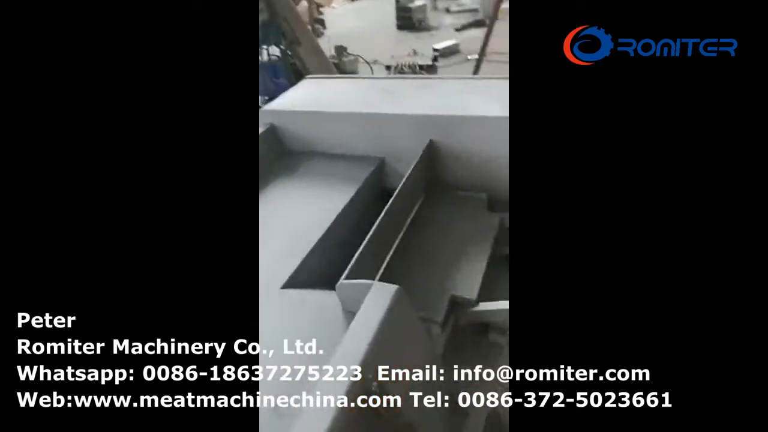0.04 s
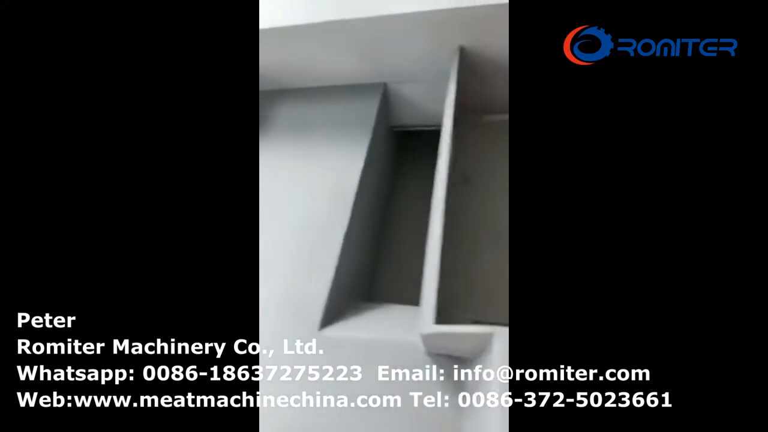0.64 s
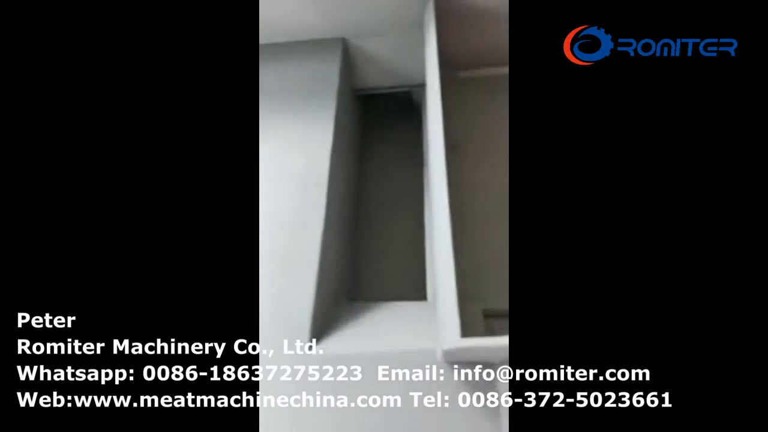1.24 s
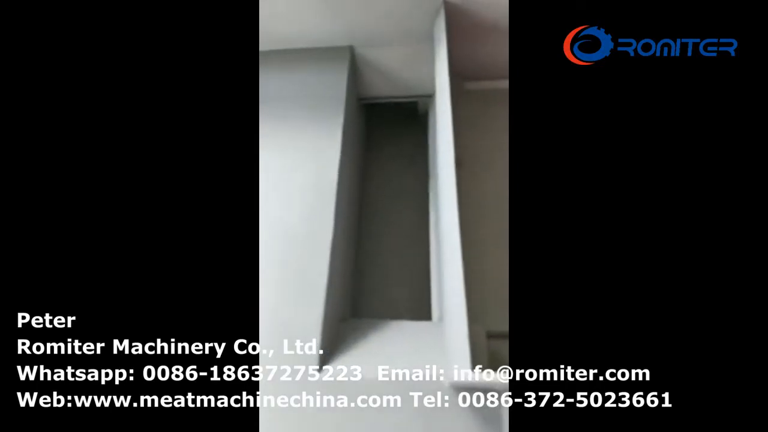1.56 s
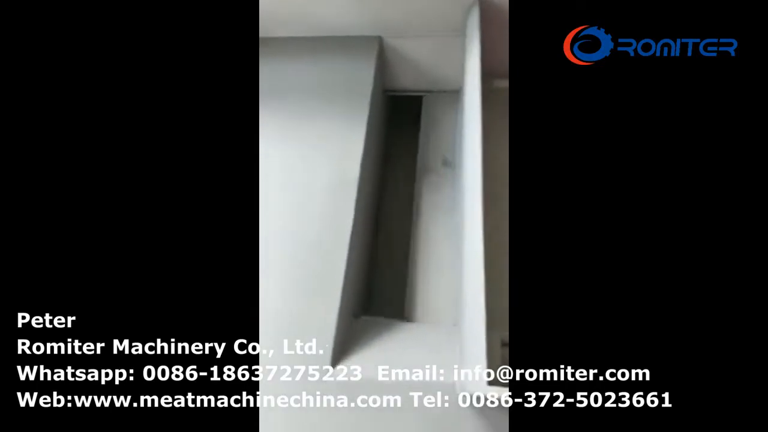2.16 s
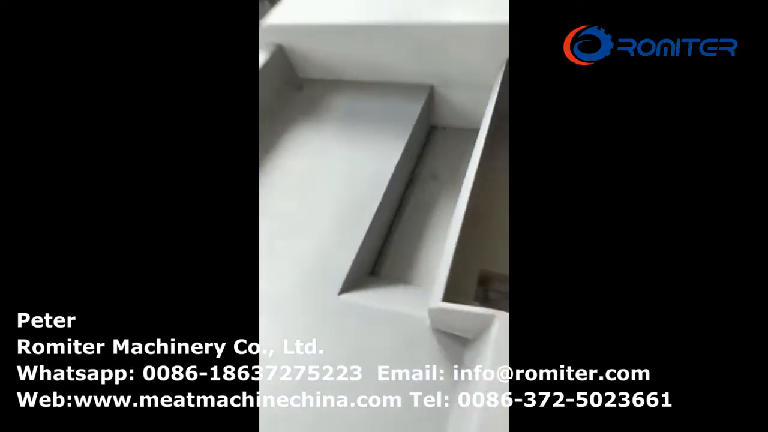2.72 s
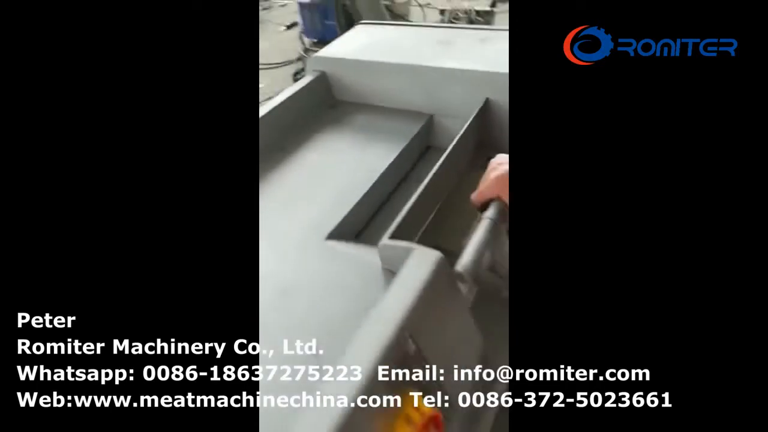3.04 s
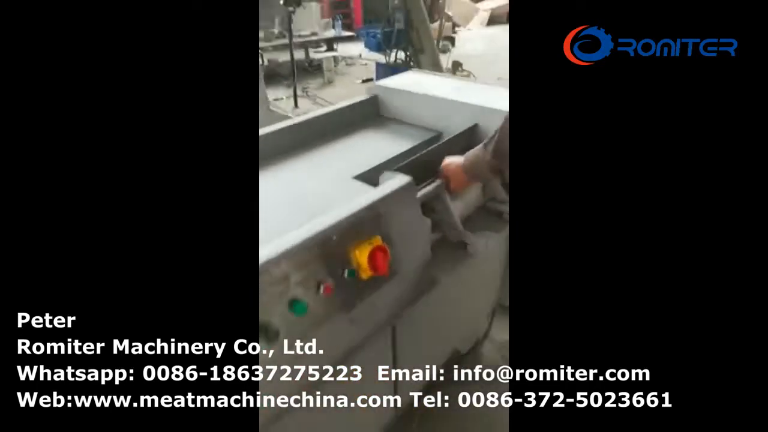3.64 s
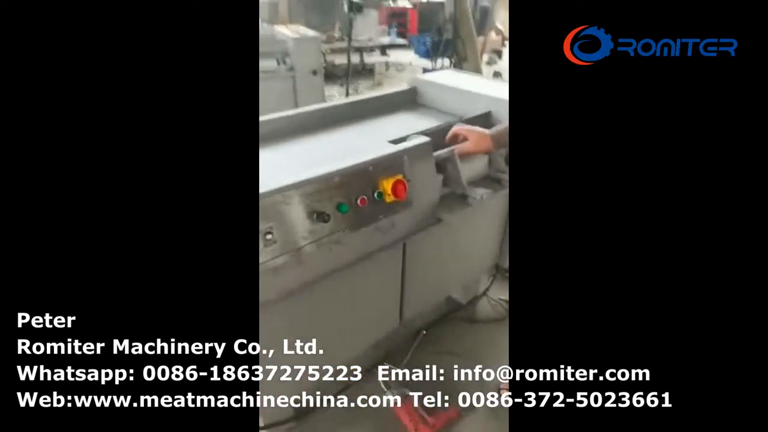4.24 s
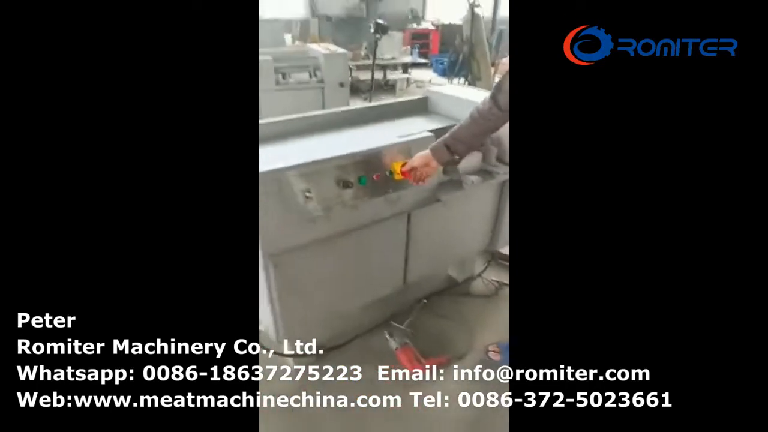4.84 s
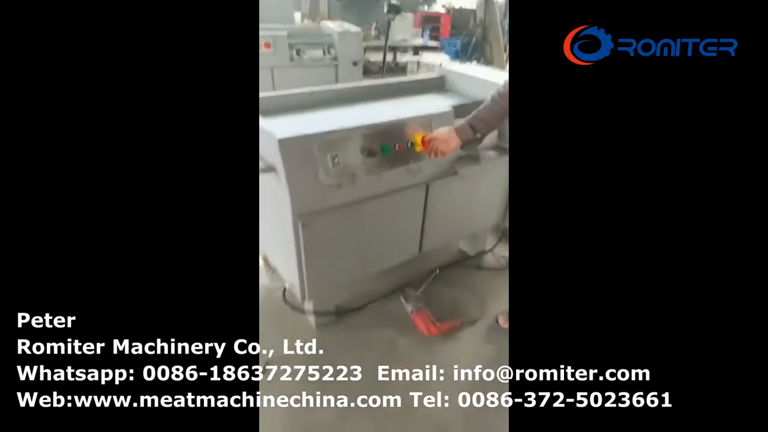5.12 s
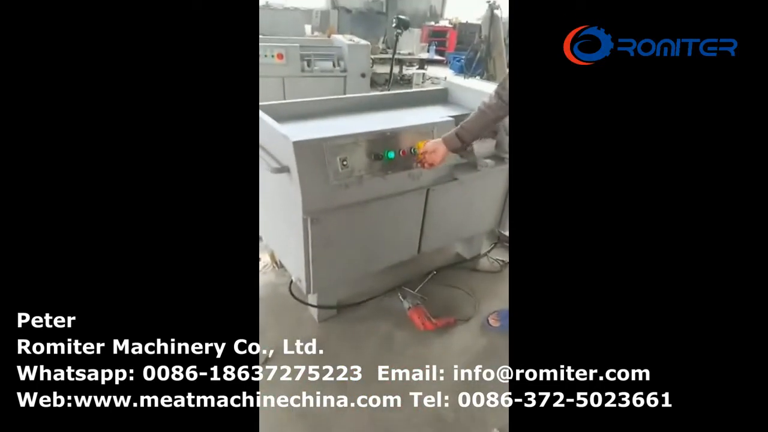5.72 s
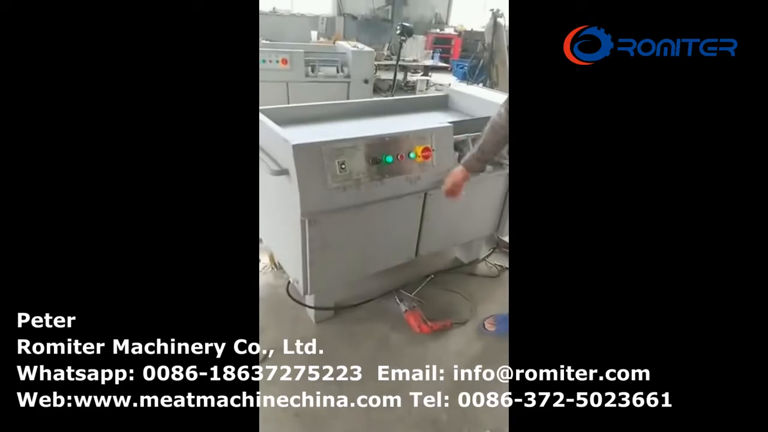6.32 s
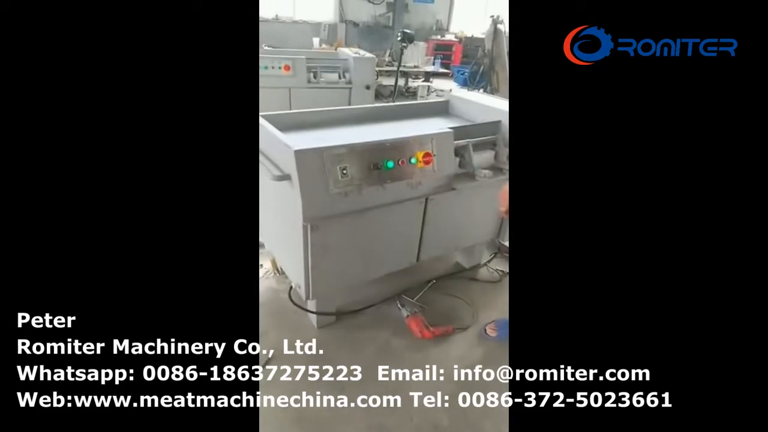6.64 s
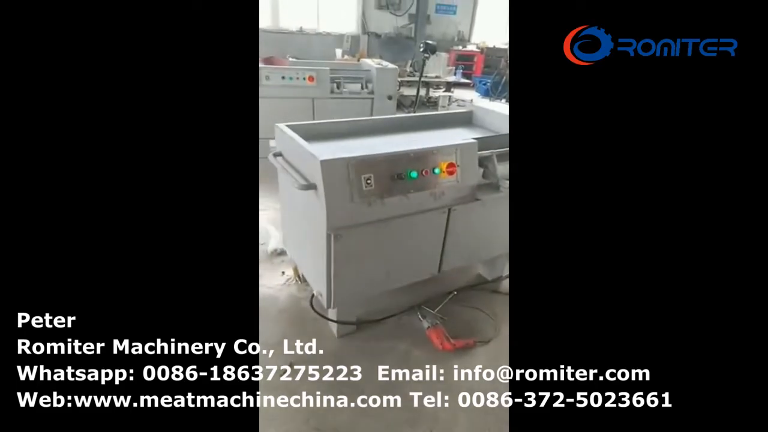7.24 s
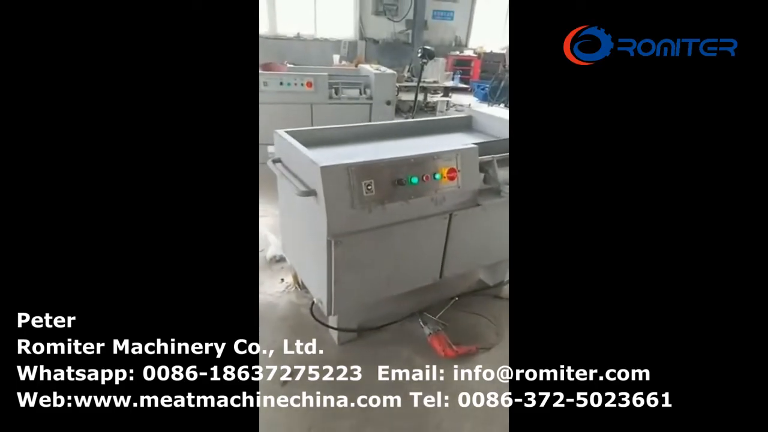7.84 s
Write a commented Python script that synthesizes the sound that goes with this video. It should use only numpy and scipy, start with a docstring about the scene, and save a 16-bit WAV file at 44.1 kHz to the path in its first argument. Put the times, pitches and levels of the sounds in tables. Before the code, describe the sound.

Close to the microphone, a steel lid slides with a low scrape and a sharp clack, followed by a deep thud from a machine's metal panels. A moment later its motor kicks in, shaking the cabinet, and runs on with an even hum. All around is the noise of a slightly echoing workshop: rumbling fans and a distant grinding disc that hisses, squeals and whines in passes.

```python
"""A busy metal workshop: fans rumble and, further off, a grinding disc rasps, squeals and rings steel.
Close by, the lid of a steel meat cutter rubs along its rails and clacks, and the handle is pushed
home with a boom of the cabinet's panels. Then the motor starts: its torque shakes the cabinet,
and it settles into a steady hum."""
import sys
import numpy as np
from scipy import signal
from scipy.fft import rfft, irfft, next_fast_len
from scipy.io import wavfile
from scipy.ndimage import uniform_filter1d, map_coordinates

SR = 44100
rng = np.random.default_rng(int(sys.argv[2]) if len(sys.argv) > 2 else 0)


def waveform_to_disk(signal):
    """Save audio, clipped to [-1, 1], as 16-bit WAV at the path in sys.argv[1]."""
    frames = np.transpose(np.atleast_2d(signal))
    scaled = np.clip(frames, -1, 1) * 32767
    samples = np.round(scaled).astype(np.int16)
    wavfile.write(sys.argv[1], SR, samples)


N = 347067

# noise spectra, bass to treble: freq_hz, density_db
RUMBLE_SPECTRUM = [(20, -26.5), (45, -13.5), (68, -9.5), (110, -2), (160, 0), (230, -4), (300, -19),
                   (500, -64.5)]
RASP_SPECTRUM = [(600, -25.5), (950, -6.5), (1300, 7.5), (1520, 3), (1950, 3.5), (2500, 2), (3200, 1),
                 (3700, -6), (5000, -12.5)]
HISS_SPECTRUM = [(2500, -28), (3500, 6.5), (4100, 4.5), (5100, 6), (5600, 3.5), (6200, 4.5), (7000, 8.5),
                 (7600, -6)]
# cabinet panel modes: pitch_hz, level_db, t60_s
PANEL_MODES = [(64.5, -3, 0.34), (89.4, -0.5, 0.35), (132.7, 6, 0.29), (198, -6.5, 0.26),
               (274.3, -10.5, 0.33)]


def amp(db):
    """Decibels to gain."""
    return 10 ** (np.asarray(db) / 20)


def unit(x):
    """Scale to rms 1."""
    return x / np.sqrt(np.mean(np.abs(x) ** 2) + 1e-20)


def along(points, hz):
    """Interpolate (freq_hz, value) points on a log axis."""
    freqs_hz, values = np.transpose(points)
    return np.interp(np.log(hz + 1), np.log(freqs_hz + 1), values)


def wobble(rate_hz):
    """Smooth random curve."""
    knots = rng.standard_normal(int(N * rate_hz / SR) + 4)
    return map_coordinates(knots, [np.arange(N) * rate_hz / SR])


def envelope(start_s, attack_s, hold_s=0, fade_db_per_s=0):
    """Gain that rises, holds, then fades; by default it stays up."""
    age_s = np.arange(N) / SR - start_s
    return np.clip(age_s / attack_s, 0, 1) * amp(-fade_db_per_s * np.maximum(age_s - attack_s - hold_s, 0))


def power_sum(envelopes):
    """Add (gain, level_db) envelopes in power; return a gain."""
    return np.sqrt(sum((gain * amp(db)) ** 2 for gain, db in envelopes))


def filtered(x, response):
    """Apply a complex frequency response."""
    size = next_fast_len(N + SR // 2)
    return irfft(rfft(x, size) * response(np.fft.rfftfreq(size, 1 / SR)), size)[..., :N]


def spread(pair, likeness=None):
    """Mix two unrelated signals to stereo: alike in the bass, diffuse above."""
    # left-right likeness in the hall: freq_hz, correlation
    hall_likeness = [(100, .992), (170, .975), (290, .91), (500, .64), (850, .17), (1440, -.1), (2440, 0),
                     (4150, -.05), (7050, .45)]
    angle = lambda hz: np.arccos(np.clip(along(likeness or hall_likeness, hz), -1, 1)) / 2
    mid, side = filtered(pair, lambda hz: np.array([np.cos(angle(hz)), np.sin(angle(hz))]))
    return np.array([mid + side, mid - side])


def rush(spectrum, patchy_db):
    """Stereo noise of rms 1 with small patches of random gain."""
    bins = signal.stft(rng.standard_normal((2, N)), nperseg=1024)[2]
    patches = uniform_filter1d(rng.standard_normal(bins.shape[1:]), size=3, axis=0)
    patches = unit(uniform_filter1d(patches, size=6, axis=1))
    pair = signal.istft(bins * amp(patchy_db * patches), nperseg=1024)[1][:, :N]
    return unit(spread(filtered(pair, lambda hz: amp(along(spectrum, hz)))))


def tone(hz, blur, rate_hz):
    """Two versions of a tone, rms 1; the share blur of its power wavers in level and phase."""
    knots = rng.standard_normal((2, int(N * rate_hz / SR) + 4, 2)) @ [1, 1j] / np.sqrt(2)
    t = np.arange(N) / SR
    drift = np.array([np.interp(t * rate_hz, np.arange(len(row)), row) for row in knots])
    steady = np.exp(2j * np.pi * rng.random((2, 1)))
    sway = np.sqrt(1 - blur) * steady + np.sqrt(blur) * drift
    return unit(np.real(sway * np.exp(2j * np.pi * hz * t)))


def resonate(x, modes):
    """Pass x through (pitch_hz, width_hz, level_db) modes, keeping the power of white noise."""
    def response(f):
        return unit(sum((-1) ** k * amp(db) * 1j * f * width / (hz * hz - f * f + 1j * f * width)
                        for k, (hz, width, db) in enumerate(modes)))
    return filtered(x, response)


def far_machines():
    """Fans and machines fill the hall; the cutter shields their noise until the listener draws back."""
    # midrange roar: freq_hz, density_db
    roar_spectrum = [(150, -65.5), (240, -4.5), (310, -3), (480, -10.5), (720, -7.5), (950, -8.5),
                     (1200, -10.5), (2000, -52)]
    # hums that swell as the listener crosses standing waves: pitch_hz, level_db, peak_s, reach_s
    fan_hums = [(69.6, -40.5, 4.4, 1), (91.7, -45, 1.6, 3.5), (152, -39, 2.8, 0.39),
                (150.3, -36, 4.85, .45), (166.5, -41, 0.26, 1.9)]
    shielded = 1 - envelope(start_s=3.12, attack_s=1)
    rumble = amp(-31.5) * rush(RUMBLE_SPECTRUM, patchy_db=1.5)
    roar = amp(-30.5) * rush(roar_spectrum, patchy_db=1.5)
    # the din comes from all round, so it is shielded less
    din = amp(-31 - 3.5 * shielded) * rush(RASP_SPECTRUM, patchy_db=3.2)
    air = amp(-60.5) * rush(HISS_SPECTRUM, patchy_db=2.5)
    t = np.arange(N) / SR
    hum = 0
    for hz, db, peak_s, reach_s in fan_hums:
        swell = 1 / np.hypot(1, ((t - peak_s) / reach_s) ** 2)
        hum += amp(db) * swell * tone(hz, blur=0.2, rate_hz=6)
    return amp(-5 * shielded) * (rumble + roar) + din + air + spread(hum)


def hall_echo(x):
    """The hall's reverberation: each frequency dies at its own speed."""
    # decay: freq_hz, t60_s
    decay_times = [(100, .9), (1000, 0.49), (7000, 0.4)]
    # echo strength: freq_hz, gain_db
    echo_gains = [(200, -8), (1000, -13), (3000, -13), (7000, -11)]
    freqs_hz, t, bins = signal.stft(rng.standard_normal((2, SR)), SR, nperseg=256)
    decay = amp(-60 * t / along(decay_times, freqs_hz)[:, None])
    tail = signal.istft(bins * decay, SR, nperseg=256)[1]
    wet = signal.fftconvolve(x, tail / np.linalg.norm(tail[0]), axes=1)[:, :N]
    return filtered(spread(wet), lambda hz: amp(along(echo_gains, hz)))


def friction_tone(hz, rate_hz):
    """A tone of rms 1 that comes in fits; rate_hz sets its line width."""
    return unit(amp(2.5 * wobble(28)) * tone(hz, blur=0.75, rate_hz=rate_hz))


def disc_skips():
    """Gain flutter of the disc skipping on the steel."""
    return amp(3 * wobble(rate_hz=130))


def disc_squeal():
    """Under a light touch the disc whistles in rough spurts over a few other tones."""
    # tones of light grinding: pitch_hz, level_db
    touch_tones = [(1260, -49), (1990, -28.5), (2552, -30), (7009, -67)]
    spurts = amp(1.6 * wobble(22)) * disc_skips()
    whistle = unit(spurts * friction_tone(hz=6028, rate_hz=85))
    touch = sum(amp(db) * friction_tone(hz, rate_hz=80) for hz, db in touch_tones)
    return amp(-37) * whistle + amp(-6) * touch


def workpiece_ring():
    """Pressed hard, the disc chatters and screeches; each workpiece mode flares on its own."""
    # workpiece modes: pitch_hz, level_db
    workpiece_modes = [(1626, -45), (1787, -46.5), (1835, -43), (2557, -41), (3521, -41), (5046, -51),
                       (5330, -51), (5520, -50), (6541, -49)]
    # screech of the disc digging in: pitch_hz, width_hz, level_db
    bite_modes = [(3270, 250, 4), (5470, 330, -0.5), (6550, 140, -13.5), (7500, 1100, -4)]
    ringing = sum(amp(db) * friction_tone(hz, rate_hz=40) for hz, db in workpiece_modes)
    screech = amp(2.5 * wobble(40)) * resonate(rng.standard_normal((2, N)), bite_modes)
    return unit(disc_skips()) * (ringing + amp(-38.5) * screech)


def treble_pings(pings_per_s=420, t60_s=0.07, low_hz=5750, high_hz=7520):
    """Dense, short, random high pings make the whine sparkle."""
    t = np.arange(int(t60_s * SR)) / SR
    decay = amp(-60 * t / t60_s)
    pings = np.zeros((2, N + SR))
    for side, when, pitch, size in rng.random((int(2 * pings_per_s * N / SR), 4)):
        hz = low_hz + pitch * (high_hz - low_hz)
        pings[int(2 * side), int(when * N):][:len(t)] += size ** 4 * np.sin(2 * np.pi * hz * t) * decay
    return unit(pings[:, :N])


def disc_whine(flicker_db=5.5):
    """A high, sizzling grinding whine whose tones flicker randomly in level."""
    # tones of heavy grinding: pitch_hz, width_hz, level_db
    whine_tones = [(5560, 110, -1), (5912, 42, 6), (6030, 70, 2), (6230, 55, 0), (6305, 55, 0),
                   (6470, 70, -2), (6651, 45, 0), (6786, 55, -1), (7175, 60, -2), (7390, 70, 0)]
    sizzle = sum(amp(db + flicker_db * wobble(45)) * tone(hz, blur=0.94, rate_hz=2 * width_hz)
                 for hz, width_hz, db in whine_tones)
    return amp(-33.5) * unit(sizzle) + amp(-38) * treble_pings()


def disc_snags(attack_s=0.0048, fade_db_per_s=450):
    """At each snag one mode of the disc or workpiece flares, its tone wavering roughly."""
    # snags: start_s, hold_s, pitch_hz, level_db
    snags = [(1.106, 0.018, 2230, -35), (1.119, .015, 3520, -33.5), (4.302, 0.052, 6028, -37.5),
             (4.43, 0.066, 6028, -36.5), (5.006, 0.013, 7450, -28.5), (5.001, 0.028, 5330, -32.5),
             (5.016, .23, 1626, -33), (5.033, 0.041, 2560, -24), (5.075, 0.083, 6450, -36),
             (5.145, 0.019, 5420, -33), (5.226, 0.022, 5450, -35), (5.298, .028, 2564, -27),
             (5.427, .025, 2557, -27), (5.614, .06, 2570, -34)]
    flares = 0
    for start_s, hold_s, hz, db in snags:
        gain = amp(db) * envelope(start_s, attack_s, hold_s, fade_db_per_s)
        flares += gain * tone(hz, blur=0.4, rate_hz=170)
    return flares


def grinder():
    """Passes rasp and hiss; a light one squeals, a sudden one rings the workpiece, a heavy one whines."""
    # disc passes: start_s, attack_s, hold_s, fade_db_per_s, rasp_db, hiss_db, voice, voice_db
    passes = [(0.045, 0.22, 0.078, 3.5, -65, -34.5, "plain", 0),
              (1.108, 0.013, 0.055, 19.5, -34.5, -35.5, "ring", -6),
              (4.127, 0.092, 0.17, 22, -27.5, -35, "squeal", -1),
              (5.002, 0.018, 0.14, 16.5, -28, -30.5, "ring", 8.5),
              (5.322, 0.035, 0.2, 6.5, -31, -37.5, "ring", -1),
              (5.592, 0.37, 0.79, 2.5, -31, -36.5, "whine", 0.5),
              (7.08, 0.13, 0.076, 11, -31, -33.5, "plain", 0)]
    # response of each voice to a pass: build_up_s, gain_exponent
    voice_response = {"squeal": (0.15, 0.82), "ring": (0.011, 1.73), "whine": (0.67, 2.2)}
    pressure = amp(0.7 * wobble(14))
    rasp = rush(RASP_SPECTRUM, patchy_db=3.3)
    sparks = unit(amp(2 * wobble(24)) * rush(HISS_SPECTRUM, patchy_db=4.2))
    voices = {"squeal": disc_squeal(), "ring": workpiece_ring(), "whine": disc_whine()}
    rasps, hisses, singing = [], [], 0
    for start_s, *shape, rasp_db, hiss_db, voice, voice_db in passes:
        gain = envelope(start_s, *shape)
        rasps.append((gain, rasp_db))
        hisses.append((gain, hiss_db))
        if voice in voices:
            build_up_s, exponent = voice_response[voice]
            singing += amp(voice_db) * envelope(start_s, build_up_s) * gain ** exponent * voices[voice]
    abrasion = power_sum(rasps) * rasp + power_sum(hisses) * sparks
    return pressure * (abrasion + spread(singing + disc_snags()))


def cabinet_boom(pushes, rise_s=0.0033):
    """The steel panels boom after each (start_s, level_db) push."""
    t = np.arange(SR // 2) / SR
    panels = sum(amp(db - 60 * t / t60_s) * np.sin(2 * np.pi * hz * t) for hz, db, t60_s in PANEL_MODES)
    panels *= 1 - np.exp(-t / rise_s)
    boom = np.zeros(N + SR)
    for start_s, db in pushes:
        boom[round(start_s * SR):][:len(t)] += amp(db) * panels
    return boom[:N]


def lid_slides():
    """Each push of the lid rubs the rails and rumbles in the cabinet."""
    # pushes: start_s, attack_s, hold_s, fade_db_per_s, rails_db, rumble_db
    slides = [(0.0, 0.024, 0.3, 39, -48.5, -35), (0.208, 0.035, 0.025, 88, -34.5, -36.5),
              (1.835, 0.19, 0.13, 107, -30.5, -34.5), (2.022, 0.16, 0.39, 40, -37, -33)]
    # rail modes: pitch_hz, width_hz, level_db
    rail_modes = [(413, 76, 8), (509, 63, 3), (569, 66, 7), (650, 77, -6.5)]
    rails_gain = power_sum((envelope(*shape), db) for *shape, db, _ in slides)
    rumble_gain = power_sum((envelope(*shape), db) for *shape, _, db in slides)
    rails = rails_gain * resonate(rng.standard_normal((2, N)), rail_modes)
    return spread(rails) + rumble_gain * rush(RUMBLE_SPECTRUM, patchy_db=0.5)


def knocks(lead_s=0.018, lead_db=-10):
    """Lid and handle contacts: steel chatters on steel, rings the lid and booms in the cabinet."""
    # contacts: start_s, clack_db, edge_db, scrape_db, boom_db, t60_s
    contacts = [(.007, -28.5, -27, -19, -47, 0.15), (2.539, -34, -33, -38.5, -47, 0.036),
                (2.615, -14.5, -23.5, -28.5, -30.5, 0.021), (2.621, -24, -14, -31, -45, 0.021),
                (2.631, -27, -23.5, -25.5, -54, 0.03), (2.858, -34.5, -33, -37.5, -31.5, 0.18),
                (3.64, -23, -37, -18.5, -18.5, 0.11), (3.664, -25, -42.5, -28, -15, 0.23),
                (3.692, -37, -31, -34, -21.5, 0.058), (3.726, -33, -44.5, -42, -19, 0.46)]
    # modes of the lid's plate and stiff edge: pitch_hz, width_hz, level_db
    plate_modes = [(191, 40, -0.5), (345, 93, 2), (433, 76, -2.5), (615, 62, -6), (725, 70, -1.5),
                   (894, 55, -3.5)]
    edge_modes = [(1525, 74, -2.5), (1822, 69, 9), (2290, 39, 0.5), (2595, 49, 2), (3110, 70, 7.5),
                  (3380, 28, -1), (4010, 97, -5), (5150, 70, -1.5), (5630, 48, -0.5), (6380, 41, 7),
                  (6730, 90, -3.5), (7170, 200, -8.5)]
    # broad rasp of a contact: freq_hz, density_db
    scrape_spectrum = [(200, 1), (520, 11), (900, 6.5), (1400, 1.5), (2400, 3.5), (3200, 2), (4400, -5),
                       (6500, -2.5), (7600, -9.5)]
    # left-right likeness close by: freq_hz, correlation
    close_likeness = [(100, .993), (300, .985), (500, .93), (850, .77), (1440, .5), (2440, .23),
                      (7050, .15)]
    chatter, pushes = np.zeros((3, N)), []
    for start_s, clack_db, edge_db, scrape_db, boom_db, t60_s in contacts:
        # the parts rub just before they meet
        lead = amp(lead_db) * envelope(start_s - lead_s, lead_s, fade_db_per_s=60 / t60_s)
        strike = envelope(start_s, attack_s=0.00037, hold_s=0.0063, fade_db_per_s=60 / t60_s)
        chatter += amp([[clack_db], [edge_db], [scrape_db]]) * (lead + strike)
        pushes.append((start_s, boom_db))
    clack, edge, scrape = chatter[:, None] * rng.standard_normal((3, 2, N))
    rasp = filtered(scrape, lambda hz: unit(amp(along(scrape_spectrum, hz)) * (hz < 7540)))
    steel = resonate(clack, plate_modes) + resonate(edge, edge_modes) + rasp
    return spread(steel, close_likeness) + cabinet_boom(pushes)


def drive_jolts():
    """The drive jerks the cabinet."""
    # jerks: start_s, level_db
    jolts = [(5.338, -17.5), (5.425, -19.5), (5.515, -23), (5.605, -23), (5.705, -27.5), (6.655, -28.5),
             (7.22, -24.5)]
    return cabinet_boom(jolts)


def motor(start_s=5.3, rise_s=0.032, spin_up_s=0.5):
    """Starting torque shakes the cabinet at once; the hum grows as the motor comes up to speed."""
    # running noise: freq_hz, density_db
    drone_spectrum = [(20, -13), (45, -15), (68, 0), (125, 2), (190, -3), (270, -7), (340, -4), (430, -6.5),
                      (540, -12), (760, -7.5), (1050, -12), (1600, -89)]
    # motor tones: pitch_hz, level_db, blur_share
    hum_lines = [(66, -50, 0.8), (99.4, -33.3, 0.28), (133, -35, 0.9), (168, -39.5, 0.96), (183.3, -40, 1),
                 (209.3, -38, .9), (249, -40.5, 0.95), (300, -40, 1), (311.3, -34.7, 0.36), (350, -43.5, 1),
                 (383, -41.5, .7), (738, -45.5, .7), (1296, -40, 0.77)]
    running = envelope(start_s, rise_s)
    at_speed = envelope(start_s, spin_up_s)
    torque = envelope(start_s, rise_s, hold_s=0.1, fade_db_per_s=29.5)
    unevenness = amp(2.3 * wobble(16))
    drone_gain = power_sum([(running, -26.5), (torque, -40)]) * unevenness
    drone = drone_gain * rush(drone_spectrum, patchy_db=2.5)
    hum = sum(amp(db) * tone(hz, blur, rate_hz=9.7) for hz, db, blur in hum_lines)
    shudder_modes = [(hz, 30, db) for hz, db, _ in PANEL_MODES]  # 30 Hz wide
    shudder = amp(-23) * torque * resonate(rng.standard_normal((2, N)), shudder_modes)
    return drone + spread(shudder + at_speed * np.sqrt(unevenness) * hum)


def scene():
    """The cutter close by, the workshop around it."""
    clatter = knocks() + lid_slides() + drive_jolts()
    return clatter + hall_echo(clatter) + motor() + far_machines() + grinder()


def record(dry, ceiling=0.75, cutoff_hz=7540, carrier_hz=16000):
    """Soft clip and steep low-pass; a faint mirror image of the treble leaks in above the cutoff."""
    rounded = dry / (1 + (dry / ceiling) ** 6) ** (1 / 6)
    passband = filtered(rounded, lambda hz: 1 / np.hypot(1, (hz / cutoff_hz) ** 400))
    mirrored = 2 * passband * np.cos(2 * np.pi * carrier_hz * np.arange(N) / SR)
    leak = filtered(mirrored, lambda hz: (hz > 9850) & (hz < 11600))
    return passband + amp(-31) * leak


dry = scene()
out = record(dry)
waveform_to_disk(out)
```